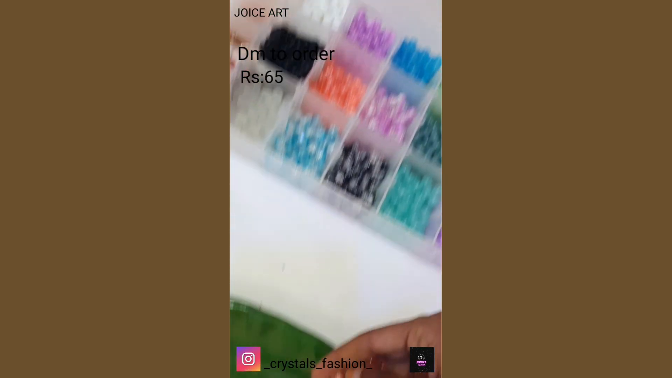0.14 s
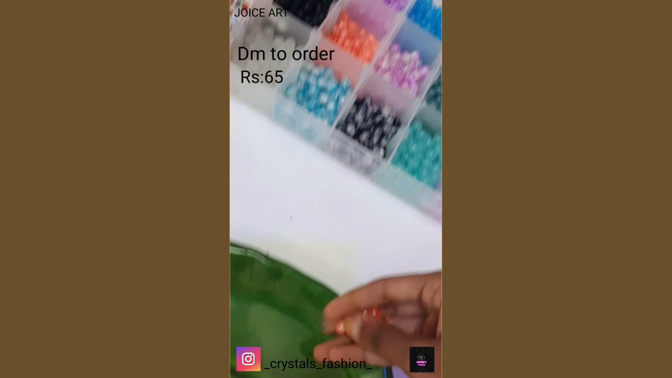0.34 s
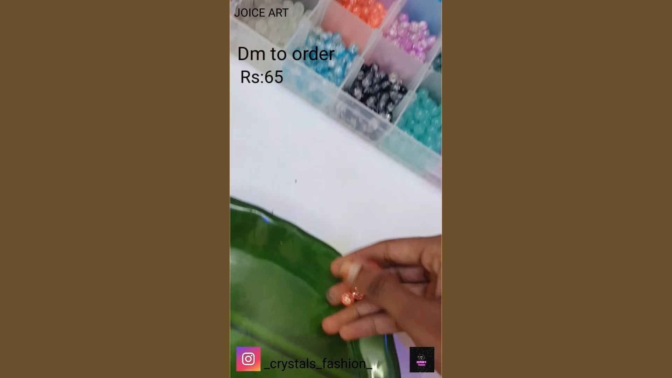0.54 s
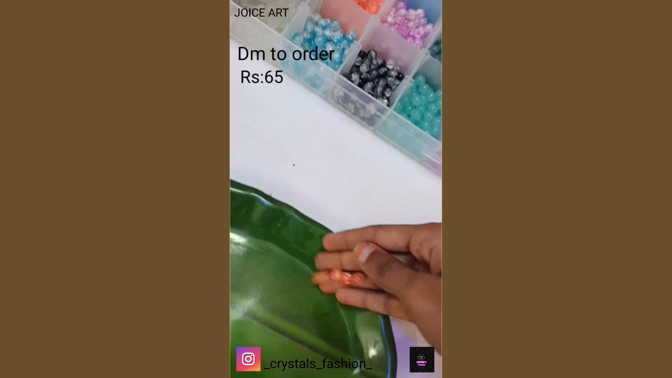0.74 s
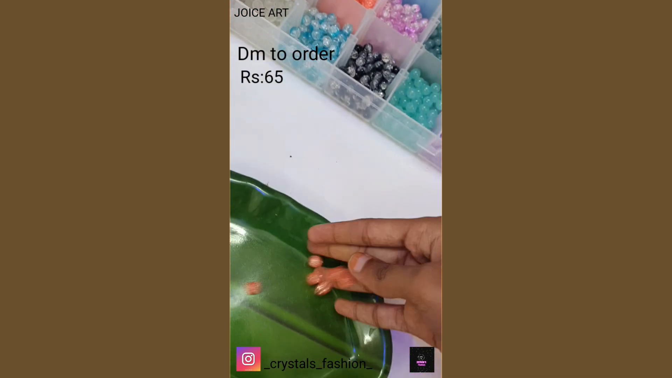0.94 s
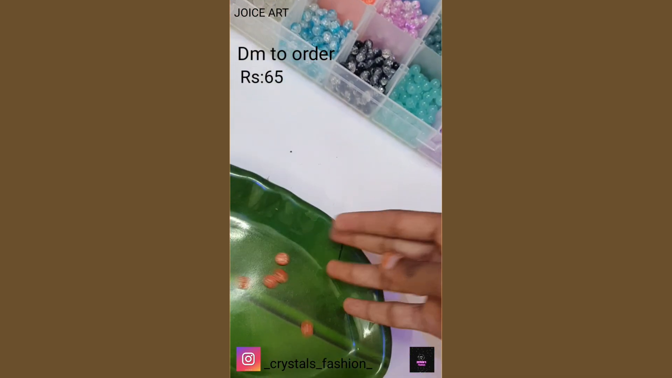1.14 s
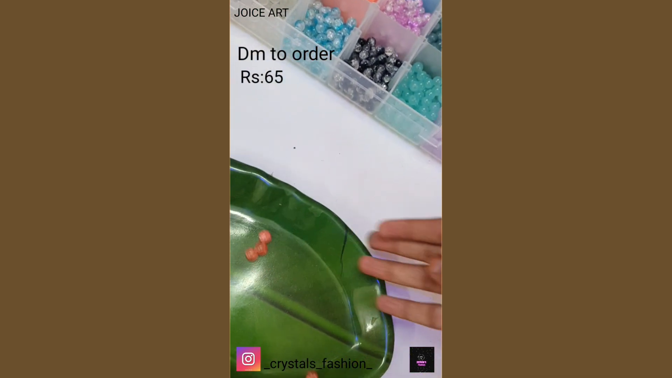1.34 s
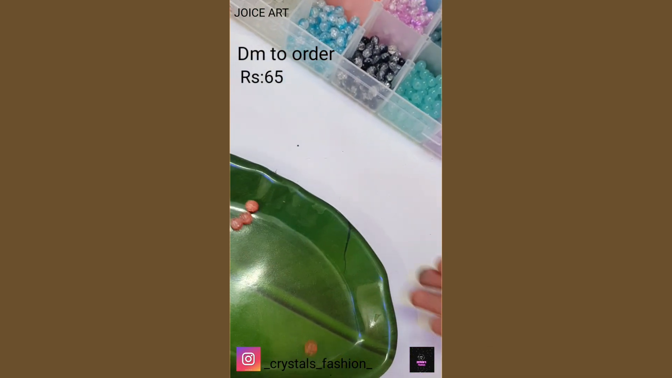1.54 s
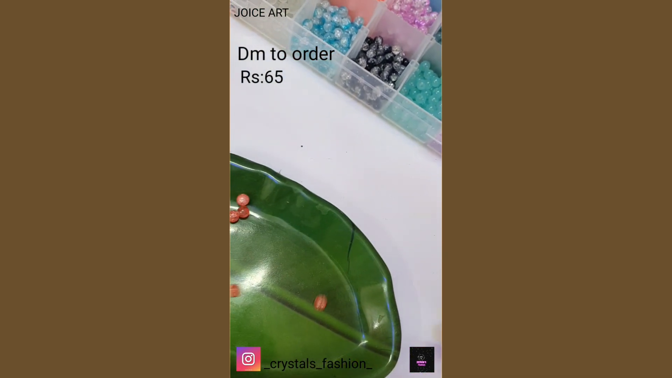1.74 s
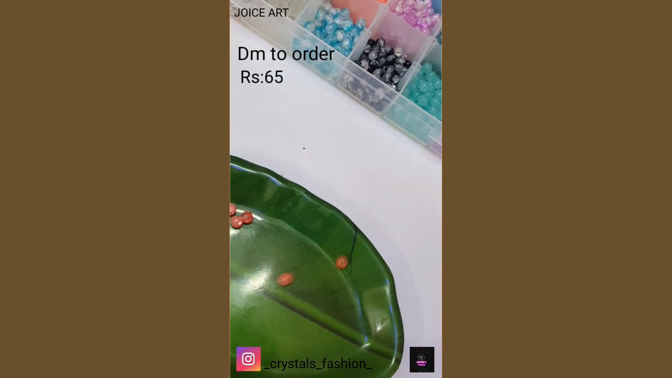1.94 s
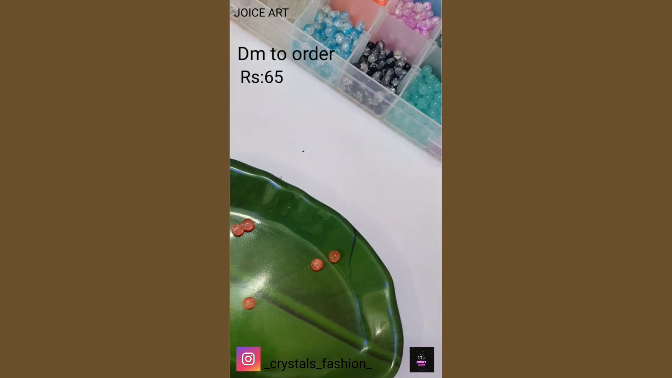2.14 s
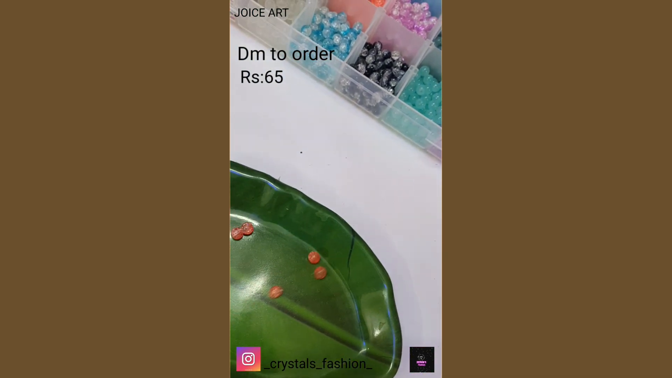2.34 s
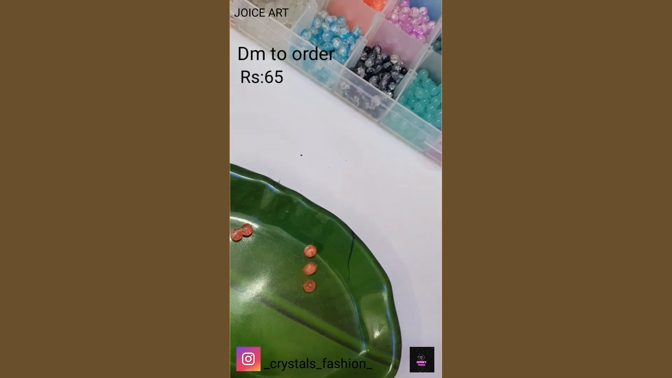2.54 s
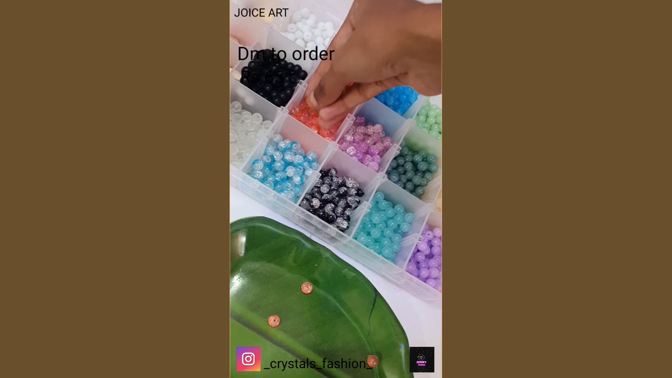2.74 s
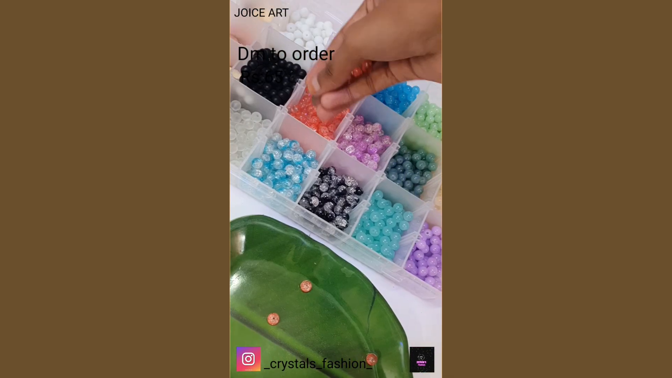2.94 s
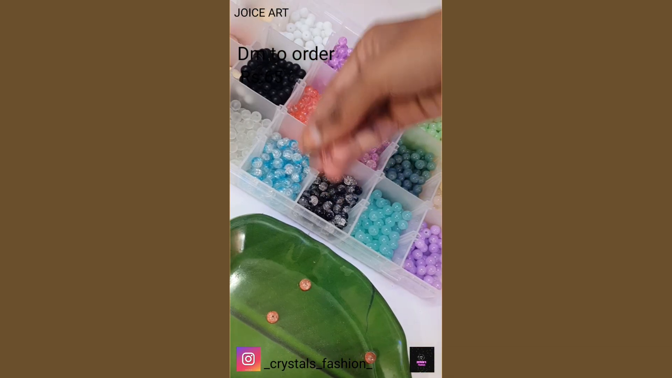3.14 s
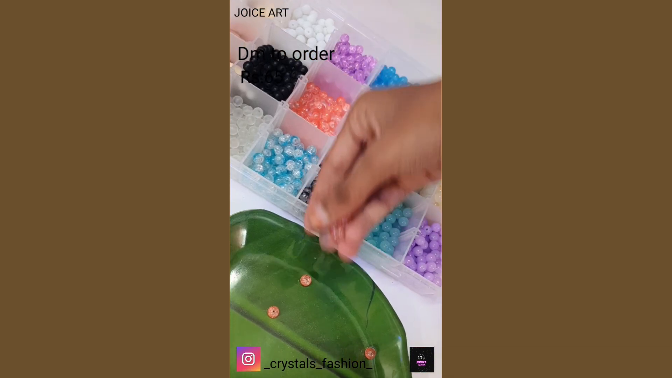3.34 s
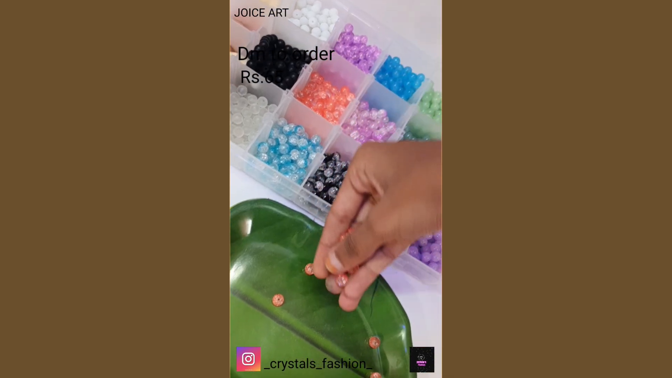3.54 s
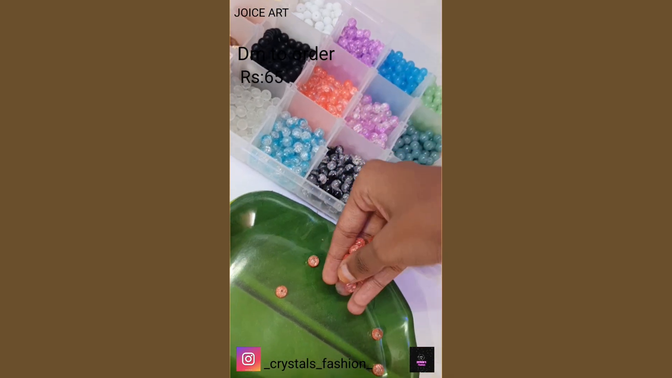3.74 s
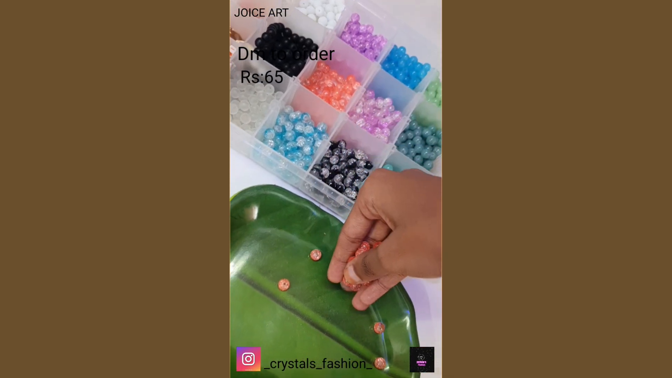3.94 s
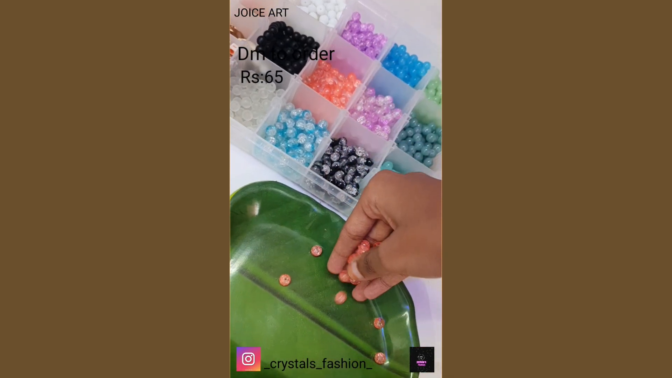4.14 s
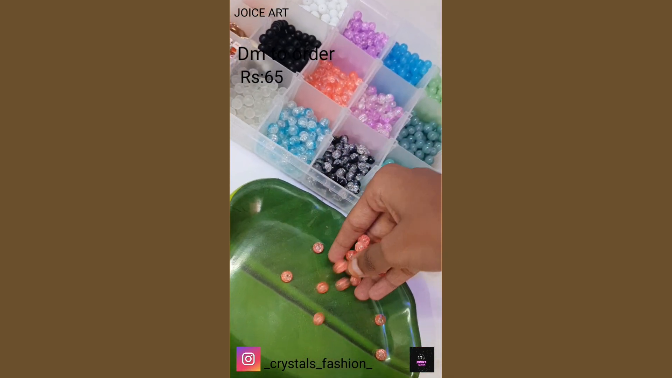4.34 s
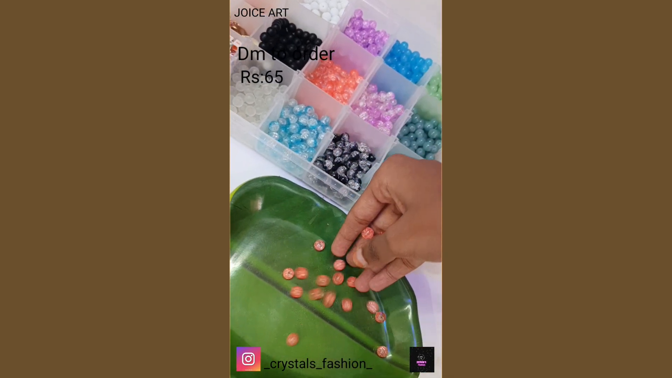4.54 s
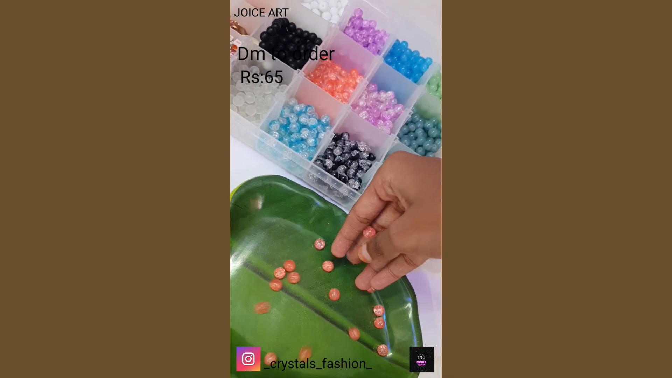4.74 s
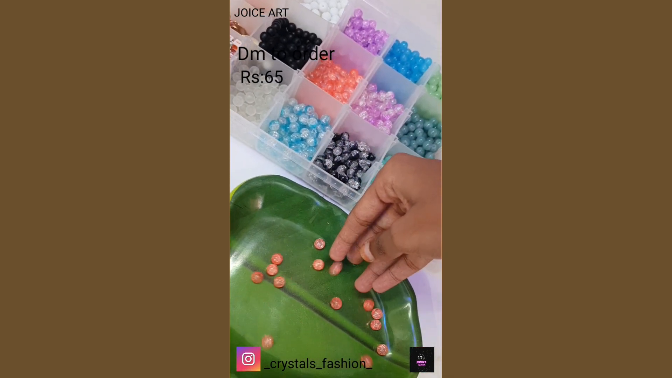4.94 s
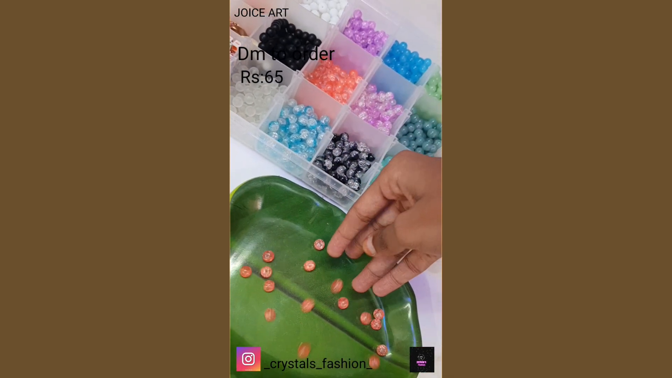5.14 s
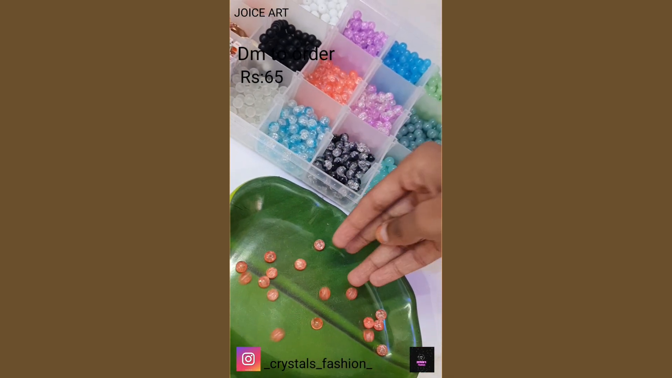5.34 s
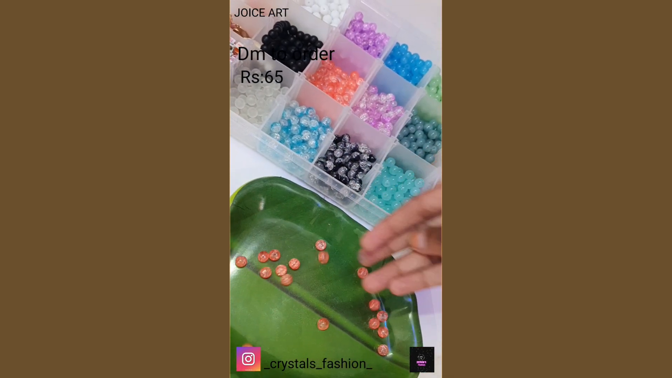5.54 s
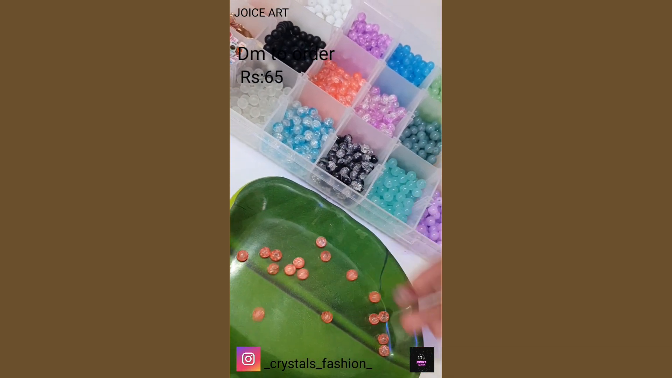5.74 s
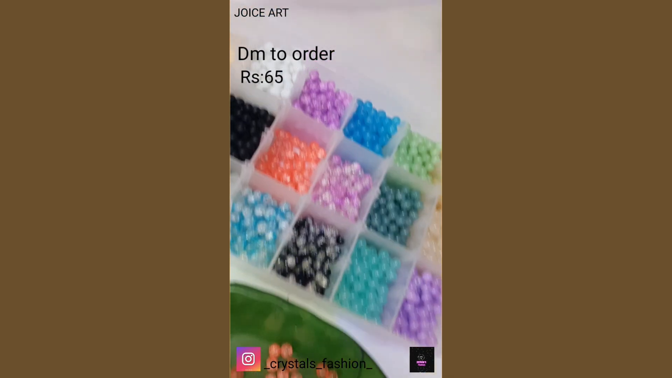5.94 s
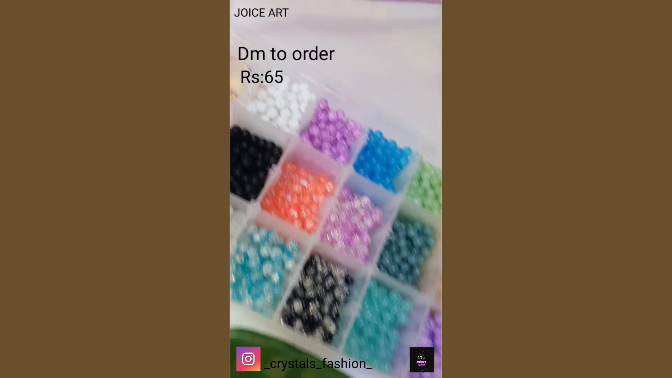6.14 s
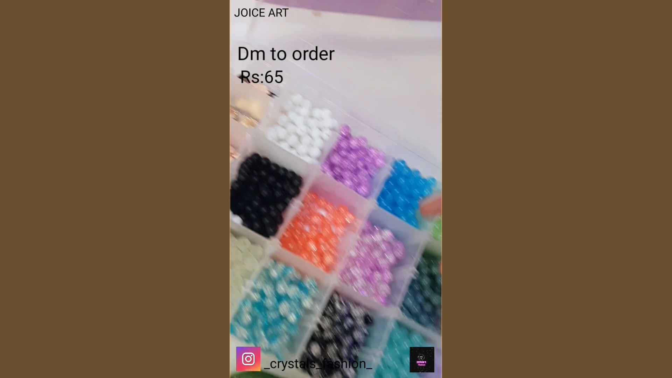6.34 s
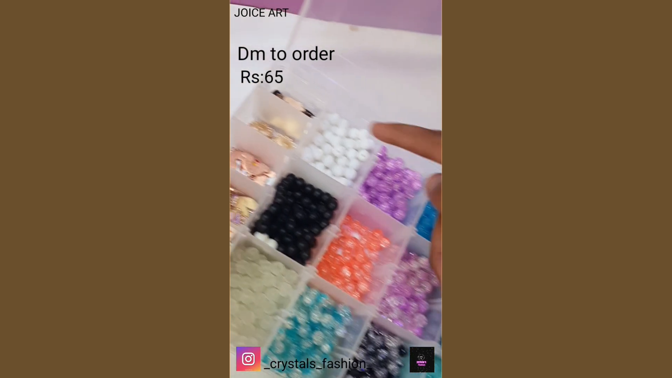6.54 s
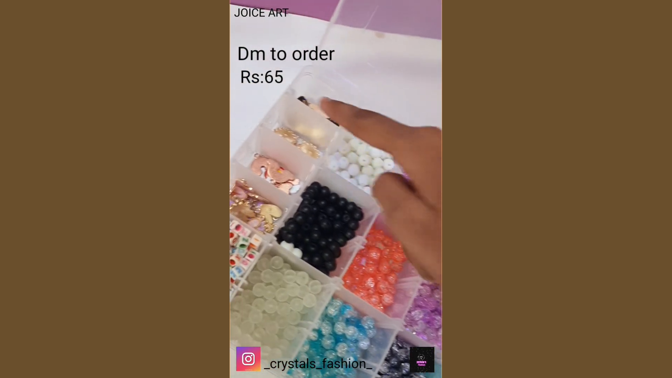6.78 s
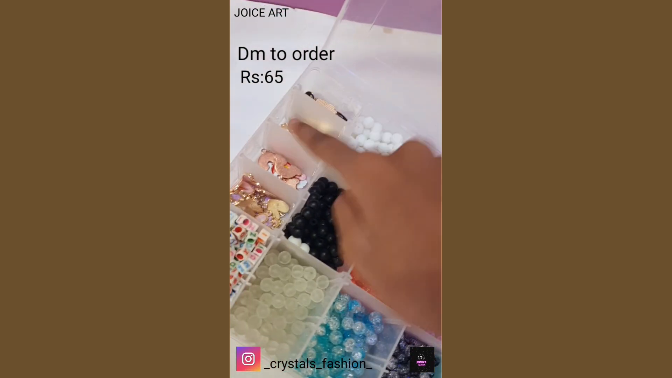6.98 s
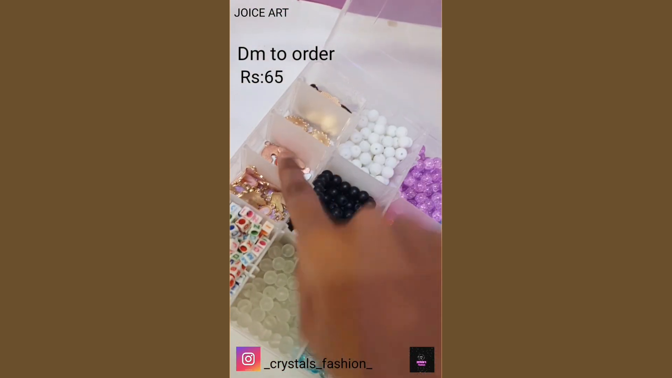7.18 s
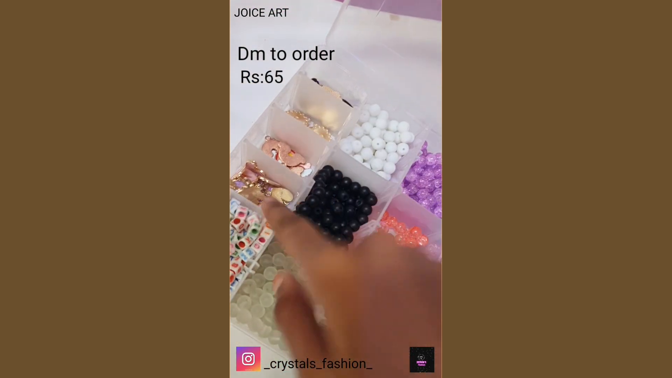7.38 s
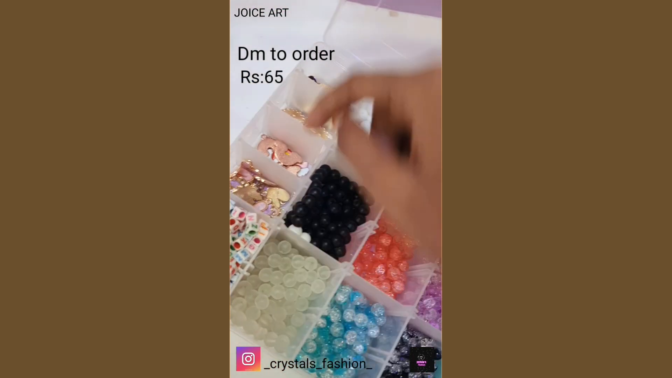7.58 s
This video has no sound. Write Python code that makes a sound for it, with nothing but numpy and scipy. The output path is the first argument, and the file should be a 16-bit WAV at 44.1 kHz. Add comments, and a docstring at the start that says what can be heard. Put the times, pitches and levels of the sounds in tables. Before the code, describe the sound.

Two bursts of beads dropped on a plastic dish, bright clattering and rolling in an echoing bare room, ending with faint knocks in a bead box.

```python
"""A bare room: two handfuls of small glass beads are let go over a leaf-shaped plastic plate.
They click in the hand as short bright ticks, then land as cracks that ring the plate's modes, and roll
as dense random taps. The hand bumps the table in low thuds; a finger pokes and drags among beads in a
plastic organiser box. Behind it lie room noise, a brief hum, a dull rush and a dense room echo."""
import sys
import numpy as np
from scipy import signal
from scipy.fft import rfft, irfft
from scipy.io import wavfile
from scipy.ndimage import uniform_filter1d

SR = 44100
rng = np.random.default_rng(int(sys.argv[2]) if len(sys.argv) > 2 else 0)


def unload_audio(sound):
    """Save the sound as a 16-bit wav file, at the path given as the first command line argument."""
    columns = np.transpose(np.atleast_2d(sound))
    # keep every value between -1 and 1, then stretch to whole-number steps
    steps = np.round(np.clip(columns, -1, 1) * 32767)
    wavfile.write(sys.argv[1], SR, steps.astype(np.int16))


N = 335601

# Each handful rolling over the dish. Each row: time in seconds, relative level of the low rumble in dB,
# relative level of the rattle in dB.
ROLL_LEVELS = [
    [(1.24, -49.5, -38), (1.29, -47.5, -35), (1.398, -42, -43), (1.726, -56.5, -48), (2.014, -47, -54.5),
     (2.284, -47.5, -48.5), (2.418, -52.5, -54.5), (2.66, -53.5, -61.5)],
    [(4.58, -48.5, -36), (4.612, -50, -42.5), (4.69, -34, -35), (4.988, -48, -48), (5.248, -61.5, -46),
     (5.428, -47.5, -43), (5.686, -50, -50.5), (5.87, -60.5, -58.5)],
]
# When each handful starts to roll, in seconds.
ROLL_STARTS = [1.115, 4.44]
# When the rolling and the room echo break off, in seconds.
BREAKS = [2.812, 6.016]
# Tone of the plastic box, also lent to the skin scuff. Each row: frequency in Hz, relative gain in dB.
BOX_TONE = [(80, -22), (250, -6.5), (450, 6), (750, 3), (1100, 5.5), (1700, 3), (2500, -6), (3600, -12.5),
            (5000, -14.5), (6600, -27), (9000, -26), (12000, -33)]
# Where the low band meets the mid band and the mid band meets the top band, in Hz.
SPLIT_HZ = (1350, 5600)

LEFT_LAG = 9  # samples by which a contact reaches the left microphone port later
T = np.arange(SR // 5) / SR  # the time axis of one blow, s


def amp(db):
    """Decibels to gain."""
    return 10 ** (np.asarray(db) / 20)


def unit(x):
    """Scales to rms 1."""
    return x / np.sqrt(np.mean(x ** 2) + 1e-20)


def read(points, hz):
    """A table's value on a log-frequency axis."""
    f, value = np.transpose(points)
    return np.interp(np.log(hz + 1), np.log(f), value)


def add(mix, s, sound):
    """Mixes a stereo sound in at time s."""
    part = mix[:, round(s * SR):][:, :sound.shape[1]]
    part += sound[:, :part.shape[1]]


def panned(db):
    """Channel gains for a left-right difference; positive leans left."""
    return amp([[db / 2], [-db / 2]])


def colour(x, points):
    """Causal minimum-phase filter with the given spectrum."""
    size = 2048
    log_gain = np.log(amp(read(points, abs(np.fft.fftfreq(size, 1 / SR)))))
    spectrum = np.exp(np.conj(signal.hilbert(log_gain)))
    taps = np.fft.ifft(spectrum).real
    return signal.oaconvolve(x, taps[None, :size // 2], axes=1)[:, :x.shape[1]]


def split(x, hz, order=5):
    """The parts of x below and above hz."""
    filters = [signal.butter(order, hz, kind, fs=SR, output="sos") for kind in ("low", "high")]
    return [signal.sosfilt(sos, x) for sos in filters]


def waver(per_s):
    """A random curve of rms 1 that turns about per_s times a second."""
    hz = np.arange(N // 2 + 1) * SR / N
    spectrum = rfft(rng.standard_normal(N)) * np.exp(-(hz / per_s) ** 2)
    return unit(irfft(spectrum, N))


def swells(rows, rise_db_per_s):
    """Gain of gestures that rise quickly to their top and fade at their own pace."""
    t = np.arange(N) / SR
    return sum(amp(db - np.maximum((s - t) * rise_db_per_s, (t - s) * fade)) for s, db, fade in rows)


def air(level_db=-67, side_db=0.0, hum_hz=488.0, hum_db=-73.5, hum_end_s=0.644):
    """Quiet room noise, nearly alike on both sides in the bass, and a faint wavering hum that soon stops."""
    # Each row: frequency in Hz, relative noise density in dB.
    air_tone = [(25, -10), (55, -1), (100, -6.5), (170, -12.5), (245, -9.5), (330, -17.5), (490, -14.5),
                (800, -21), (1600, -26), (2500, -37), (5000, -42.5), (6300, -52.5), (9500, -43.5),
                (12000, -54)]
    mid, side = colour(rng.standard_normal((2, N)), air_tone)
    side = .25 * side + amp(side_db) * split(side, 250, order=1)[1]
    noise = amp(level_db) * unit(mid + np.array([side, -side]))
    t = np.arange(N) / SR
    hum_fade = np.clip((hum_end_s - t) / .05, 0, 1)
    hum = amp(hum_db + 1.7 * waver(19)) * unit(np.sin(2 * np.pi * hum_hz * t)) * hum_fade
    return noise + hum


def rush(rise_db_per_s=231):
    """A dull, hollow rush of filtered noise that swells three times."""
    # Each row: time of the top in seconds, level in dB, fading in dB per second.
    rush_swells = [(3.24, -59.5, 20), (3.6, -58.5, 21.5), (3.96, -59.5, 27.5)]
    # Each row: frequency in Hz, relative gain in dB.
    rush_tone = [(150, -17), (260, -10), (420, -10.5), (530, 1), (780, 0), (1050, -9), (1700, -20),
                 (3000, -36.5), (6000, -49.5)]
    noise = unit(colour(rng.standard_normal((2, N)), rush_tone))
    return noise * swells(rush_swells, rise_db_per_s)


def room(x, build_s=0.0086, alike_hz=900.0, count=3):
    """Hard walls: a dense tail that builds up and dies band by band, changing as the beads move about."""
    # Each row: frequency in Hz, time to die by 60 dB in seconds.
    room_t60 = [(250, 0.6), (700, 0.55), (1700, 0.2064), (4500, 0.5036), (10000, 0.4361)]
    # Each row: frequency in Hz, relative gain of the echo in dB.
    room_tone = [(200, -4.5), (700, -1), (1700, -3.5), (4500, -1.5), (9000, -0.5)]
    out, t = np.zeros_like(x), np.arange(x.shape[1]) / SR
    for k in range(count):
        hz, age, z = signal.stft(rng.standard_normal((2, SR)), SR, nperseg=256)
        alike = np.exp(-(hz[:, None] / alike_hz) ** 2)  # long waves reach both ports alike
        z[1] = alike * z[0] + np.sqrt(1 - alike ** 2) * z[1]
        decay = amp(-60 * age / read(room_t60, hz)[:, None])
        tail = signal.istft(z * decay, SR, nperseg=256)[1]
        tail *= 1 - np.exp(-(np.arange(tail.shape[1]) / SR / build_s) ** 2)
        tail /= np.linalg.norm(tail[0])
        # the tails keep trading places, at constant total power
        share = np.sqrt(2 / count) * np.cos(2 * np.pi * t + np.pi * k / count)
        out += signal.fftconvolve(x * share, tail, axes=1)[:, :len(t)]
    return colour(out, room_tone)


def table_bumps(level_db=2.0, rise_s=0.0073, scuff_db=-17.5):
    """Soft flesh excites only the table's lowest modes, with a faint scuff of skin."""
    # Each row: start in seconds, relative level in dB, pitch as a factor on the table's modes.
    hand_bumps = [(0.958, -45.5, 0.99), (0.986, -31, 0.86), (1.026, -32.5, 1.01), (6.867, -44, 0.68),
                  (7.52, -43, 0.55), (7.560, -43.5, 0.26)]
    # Each row: frequency in Hz before the pitch factor, relative level in dB, t60 in seconds.
    modes = [(62, -15, 0.13), (138, -1.0, 0.084), (248, 0, 0.039)]
    out = np.zeros((2, N))
    for s, db, pitch in hand_bumps:
        thud = sum(amp(mode_db - 60 * T / t60) * np.sin(2 * np.pi * hz * pitch * T)
                   for hz, mode_db, t60 in modes)
        scuff = unit(colour(rng.standard_normal((2, len(T))), BOX_TONE)) * amp(scuff_db - 60 * T / 0.26)
        soft_rise = 1 - np.exp(-T / rise_s)
        add(out, s, amp(db + level_db) * (thud + scuff) * soft_rise)
    return out


def crack(points, t60, scatter):
    """A sharp contact and the dense, quickly dying ring behind it; energy 1 on the left."""
    ring = rng.standard_normal((2, len(T))) * amp(-60 * T / t60)
    x = scatter * ring / np.linalg.norm(ring[0])
    x[[0, 1], [LEFT_LAG, 0]] += 1  # the contact itself
    x = colour(x, points)
    return x / np.linalg.norm(x[0])


def blow(x, mid_db, low_db, top_db, size=617):
    """Sets a blow's weight and hardness: the levels of three bands over its first size samples."""
    low, rest = split(x, SPLIT_HZ[0])
    mid, top = split(rest, SPLIT_HZ[1])
    bands = zip((low, mid, top), (low_db, 0, top_db))
    return amp(mid_db) * sum(amp(db) * band / band[:, :size].std() for band, db in bands)


def box_knock(ring_db=-7.5):
    """One knock on the box: a rattling crack and the ring of its walls."""
    # Modes of the walls. Each row: frequency in Hz (detuned per knock), relative level in dB, t60 in seconds.
    wall_modes = [(438, -35, 0.12), (795, 5, 0.057), (1271, 1, 0.12), (1753, -5, 0.064), (3056, -5, 0.046),
                  (3793, 0, 0.028)]
    ring = sum(amp(db - 60 * T / t60) * np.sin(2 * np.pi * hz * rng.uniform(0.93, 1.04) * T)
               for hz, db, t60 in wall_modes)
    rattle = crack(BOX_TONE, t60=0.046, scatter=1.24)
    return rattle + amp(ring_db) * ring / np.linalg.norm(ring)


def box_pokes(level_db=-10.0, slips_per_s=600, spread_db=4.5, drag_rise_db_per_s=248):
    """Beads knock on the compartment walls, and scrape in tiny slips under the dragging finger."""
    # A finger knocks the box and its beads. Each row: start in seconds, relative mid band level in dB,
    # low band re mid in dB, top band re mid in dB.
    finger_pokes = [(2.854, -70.5, 15, -22), (2.994, -31, -9.5, -23), (6.8609, -61.5, 21, -35),
                    (7.3412, -53, -8, -41), (7.4596, -37, 0, -13), (7.471, -36.5, -1, -11),
                    (7.5126, -48, 3, -28)]
    # A fingertip drags. Each row: time of the top in seconds, level in dB, fading in dB per second.
    finger_drags = [(6.89, -65.5, 88), (7.465, -51.5, 71)]
    slip_force = amp(spread_db * np.minimum(rng.exponential(1, N), 4))
    slips = (rng.random(N) < slips_per_s / SR) * slip_force
    scrape = unit(signal.oaconvolve(slips[None], box_knock(), axes=1)[:, :N])
    out = scrape * swells(finger_drags, drag_rise_db_per_s)
    for s, mid_db, low_db, top_db in finger_pokes:
        add(out, s, blow(box_knock(), mid_db + level_db, low_db, top_db))
    return out


def hand_clicks(level_db=10.0):
    """Beads touch between the fingers: tiny bright ticks."""
    # Glass on glass. Each row: start in seconds, relative level in dB.
    glass_ticks = [(0.3559, -42), (0.414, -30), (0.437, -52), (0.602, -39.5), (0.672, -49), (0.8024, -38),
                   (0.907, -44), (0.9635, -37), (1.041, -34.5), (3.5665, -53), (4.377, -33.5)]
    # Each row: frequency in Hz, relative gain in dB.
    glass_tone = [(500, -37.5), (2000, -21), (3000, -8), (4200, -2.5), (6500, -9), (9000, -2.5),
                  (11000, -9.5), (13000, -16.5)]
    out = np.zeros((2, N))
    for s, db in glass_ticks:
        add(out, s, amp(db + level_db) * crack(glass_tone, t60=.014, scatter=1.5))
    return out * panned(1.5)


def place_at(s):
    """Where the beads are on the plate at time s: 0 rim - 1 middle."""
    # Each row: time in seconds, place from 0 (rim) to 1 (middle).
    bead_place = [(2.6, 0.018), (4.4, 1)]
    return np.clip(np.interp(s, *np.transpose(bead_place)), 0, 1)


def plate_ring(s, wander_db=3.5, spread=.45):
    """The plate's modes, each as strong as the landing spot allows; energy 1 on the left."""
    # Each row: frequency in Hz (slightly shifted per blow), relative level struck near the rim in dB,
    # relative level struck near the middle in dB, t60 in seconds.
    plate_modes = [(853, -9, -14, 0.055), (1077.5, -1.5, 0, 0.08), (1226, 3, -1, 0.067),
                   (1454, -14, -4, 0.03), (1569, -12, 6, 0.069), (1803, -11.5, 3.5, 0.1),
                   (2130, -1.5, -14, 0.019), (2232, -11, -7.5, 0.23), (2532, -14.5, -30.5, 0.039),
                   (3000, -5, -18.5, 0.075), (3090, -14.5, -7, 0.054), (3400, -8.5, -12, 0.055),
                   (3700, -15, -13.5, 0.11), (3900, -15.5, -22.5, 0.0083), (4900, -17, -21.5, .045),
                   (4860, -11.5, -5, 0.02)]
    hz, rim_db, middle_db, t60 = np.transpose(plate_modes)[:, :, None]
    luck, phase = rng.standard_normal((2, 2, len(plate_modes), 1))
    spot_db = rim_db + place_at(s) * (middle_db - rim_db)
    level = amp(spot_db + wander_db * luck - 60 * T / t60)
    hz = hz * (1 + .007 * rng.standard_normal(hz.shape))  # the beads lying on the plate shift its modes
    lag = np.array([LEFT_LAG, 0])[:, None, None] / SR
    x = (level * np.sin(2 * np.pi * hz * (T - lag) + spread * phase)).sum(1)
    return x / np.linalg.norm(x[0])


def rolling(bumps_per_s=300, spread_db=3.5, ring_db=-6.0, rumble_db=1.5, rattle_db=1.5,
            tumble_db=3.0, tumbles_per_s=30, rise_s=0.16, count=3):
    """Rolling beads tap the plate with every flaw and thread hole; each tumbles unevenly on its own spot."""
    # Each row: frequency in Hz, relative gain in dB.
    roll_tone = [(200, -35.5), (450, -23), (700, -11), (950, 0.5), (1200, 3.5), (1450, -4), (2000, 1),
                 (2800, -10), (5000, -23.5), (6500, -36.5), (10500, -37.5)]
    out, t = np.zeros((2, N)), np.arange(N) / SR
    for rows, start, end in zip(ROLL_LEVELS, ROLL_STARTS, BREAKS):
        s, low_db, high_db = np.transpose(rows)
        beads = np.zeros((2, N))
        for _ in range(count):
            taps = (rng.random(N) < bumps_per_s / SR) * rng.choice([-1, 1], N)
            force_db = spread_db * np.minimum(rng.exponential(1, N), 4)
            taps = taps * amp(force_db + tumble_db * waver(tumbles_per_s))
            ring = amp(ring_db) * colour(plate_ring(start), roll_tone)
            body = crack(roll_tone, t60=0.037, scatter=3.1) + ring
            beads += signal.oaconvolve(taps[None], body, axes=1)[:, :N]
        low, high = split(beads, SPLIT_HZ[0])
        rumble = unit(low) * amp(rumble_db + np.interp(t, s, low_db))
        rattle = unit(high) * amp(rattle_db + np.interp(t, s, high_db))
        out += (rumble + rattle) * np.clip((t - start) / rise_s, 0, 1) * (t < end)
    return out * panned(0.27)


def nearby(x, echo_db=-12.0, reach_s=.009, count=4):
    """Quick echoes off the table, the hand and the box, different at each port."""
    out = x.copy()
    for channel in range(2):
        for late, sign in zip(rng.uniform(.1, 1, count) * reach_s, rng.choice([-1, 1], count)):
            lag = round(late * SR)
            out[channel, lag:] += sign * amp(echo_db) * x[channel, :x.shape[1] - lag]
    return out


def landing(s, mid_db, low_db, top_db, ring_db=-0.5, lowest_hz=560.0,
            ahead_db=-21.5, pan_per_db=0.38, widest_pan_db=-2.5):
    """One bead cracks and rings the plate, which is too small to radiate bass."""
    # Each row: frequency in Hz, relative gain in dB.
    crack_tone = [(100, -37), (300, -21), (550, -10.5), (800, -1), (1100, 1), (2000, 3), (2700, -4.5),
                  (5150, -5.5), (5900, -11.5), (6800, -10.5), (8200, -5), (10300, -8.5), (12000, -28.5)]
    x = nearby(crack(crack_tone, t60=0.029, scatter=1.8) + amp(ring_db) * plate_ring(s))
    without_bass = split(x, lowest_hz, order=2)[1]
    # hard landings lie straight ahead; weaker ones have run off to the right
    pan_db = np.clip(pan_per_db * (mid_db - ahead_db), widest_pan_db, 0)
    return blow(without_bass, mid_db, low_db, top_db) * panned(pan_db)


def nudges(level_db=-2.0, spread_db=5.5, low_db=0.0, top_db=-25.5, count=22):
    """Rolling beads nudge the rim and each other at random, harder when they rattle more."""
    out = np.zeros((2, N))
    for rows, start, end in zip(ROLL_LEVELS, ROLL_STARTS, BREAKS):
        s, _, rattle_db = np.transpose(rows)
        for k in range(count):
            at = start + (end - start) * (k + rng.random()) / count
            db = np.interp(at, s, rattle_db) + level_db + rng.uniform(-spread_db, spread_db)
            add(out, at, landing(at, db, low_db, top_db))
    return out


def drops(level_db=-1.5, rebound_s=0.006, rebound_db=-10, rebound_from_db=-23.5):
    """The clear landings; the springy middle of the plate throws the hard ones back once."""
    # A bead lands on the plate or hits its rim. Each row: start in seconds, relative mid band level in dB,
    # low band re mid in dB, top band re mid in dB.
    bead_drops = [(1.1152, -15.5, -6, -14.5), (1.2816, -16.5, -5.5, -15), (1.298, -16.5, -11, -15),
                  (1.3448, -17.5, -4, -11), (1.355, -21, 4, -8.5), (1.3805, -37.5, -4.5, -9),
                  (1.4144, -17, 1, -13.5), (1.4361, -30.5, -0.5, -11), (1.4826, -31, -1, -17.5),
                  (1.542, -35.5, -6, -12.5), (1.6035, -29.5, -5, -9), (1.7688, -29.5, -25, -21),
                  (1.8054, -35.5, -27, -25), (2.2475, -28.5, -8.5, -19), (2.2754, -34, -11, -16),
                  (2.4133, -27, -17, -20), (2.43, -34.5, -14, -14), (2.609, -34.5, -13, -14),
                  (4.439, -15.5, 0.5, -17), (4.4699, -31, -9.5, -14), (4.5132, -21, -1, -14.5),
                  (4.6505, -16.5, 0.5, -16.5), (4.6687, -24, -11.5, -7), (4.685, -16.5, -1, -11.5),
                  (4.7153, -19.5, -12.5, -12.5), (4.7348, -19, -6, -11.5), (4.7832, -13.5, -9.5, -10),
                  (4.8306, -24.5, -6.5, -12), (4.8515, -22.5, 1.5, -7.5), (4.871, -23.5, -25, -11),
                  (5.2385, -15.5, -6.5, -9), (5.3764, -19, -4.5, -5.5), (5.4454, -30.5, -29, -8),
                  (5.629, -42.5, 1.5, -19), (5.7665, -48.5, 4, -18), (5.8873, -42.5, -11, -20),
                  (5.9192, -44, -18, -15), (5.9586, -41.5, -15, -15)]
    out = np.zeros((2, N))
    for s, db, low_db, top_db in bead_drops:
        add(out, s, landing(s, db, low_db, top_db))
        rebound = amp(rebound_db) * place_at(s) * (db > rebound_from_db)
        add(out, s + rebound_s, rebound * landing(s, db, low_db, top_db))
    return amp(level_db) * out


def scene():
    """All sources; the bead and box sounds each send their share to the room."""
    # How much the right microphone port hears above the left. Each row: frequency in Hz, gain in dB.
    right_tone = [(200, 1), (1000, -1), (2500, 4), (4500, 2), (9000, 0.5)]
    hits, roll, clicks, pokes = drops() + nudges(), rolling(), hand_clicks(), box_pokes()
    sent = amp(-6.5) * hits + amp(-9.0) * roll + amp(-5.5) * clicks + amp(-5.0) * pokes
    # the echo is cut at each break and starts afresh
    parts = np.split(sent, [round(s * SR) for s in BREAKS], axis=1)
    echo = np.hstack([room(part) for part in parts])
    left, right = hits + roll + clicks + pokes + echo + table_bumps() + rush() + air()
    return np.vstack([left, colour(right[None], right_tone)])


def record(dry, ceiling_db=-22.5, squeeze=0.52, release_db_per_s=399.5, edge_hz=11100):
    """A fast limiter takes off about half of each excess over the ceiling; then a low-pass."""
    power_db = 10 * np.log10(abs(uniform_filter1d((dry ** 2).mean(0), size=130)) + 1e-12)
    fall = np.arange(N) * release_db_per_s / SR
    held_power_db = np.maximum.accumulate(power_db + fall) - fall  # peaks released at a steady rate
    over_db = np.maximum(held_power_db - ceiling_db, 0)
    held = dry * amp(-squeeze * uniform_filter1d(over_db, size=60))
    low_pass = signal.firwin(201, edge_hz, window=("kaiser", 8), fs=SR)
    return signal.oaconvolve(held, low_pass[None], "same")


dry = scene()
out = record(dry)
unload_audio(out)
```